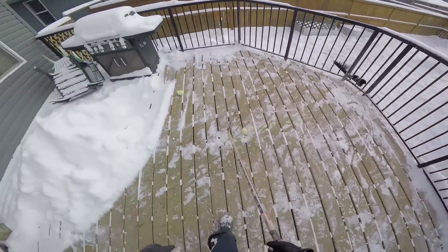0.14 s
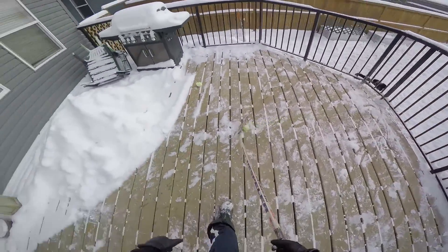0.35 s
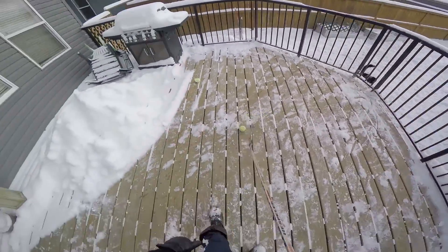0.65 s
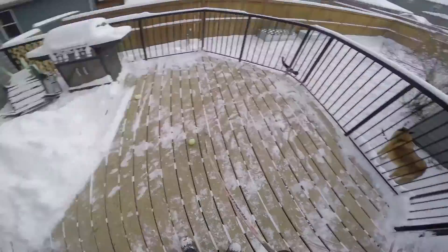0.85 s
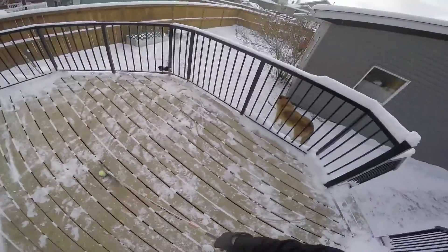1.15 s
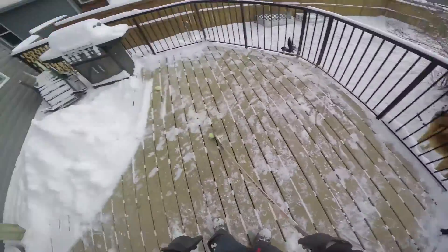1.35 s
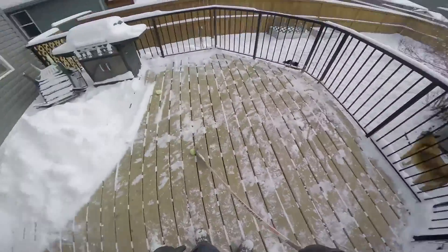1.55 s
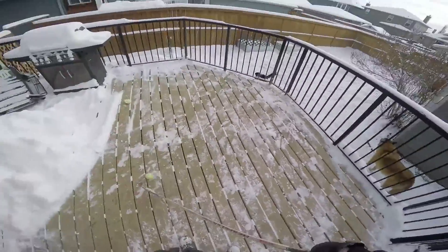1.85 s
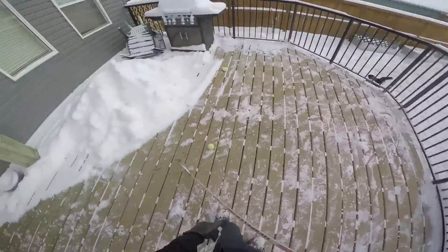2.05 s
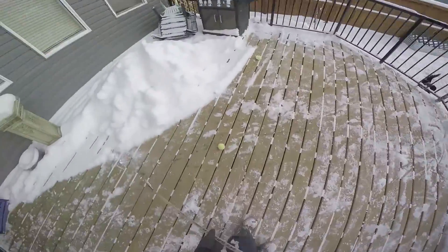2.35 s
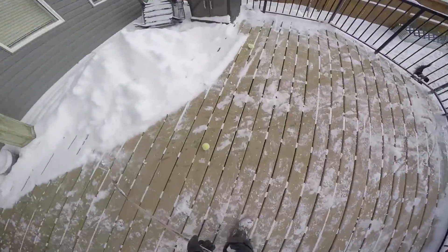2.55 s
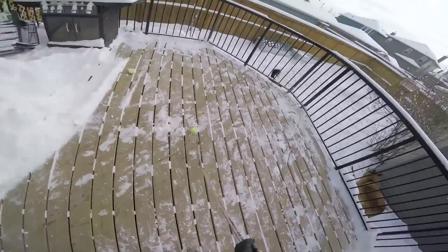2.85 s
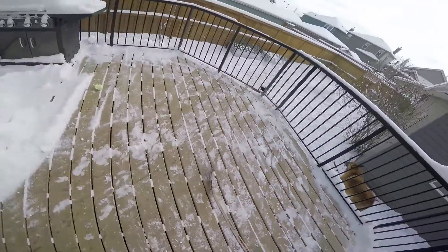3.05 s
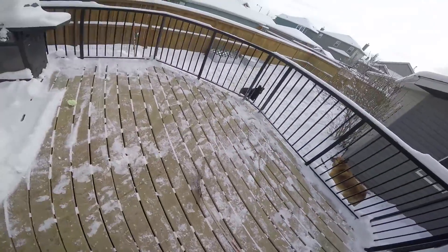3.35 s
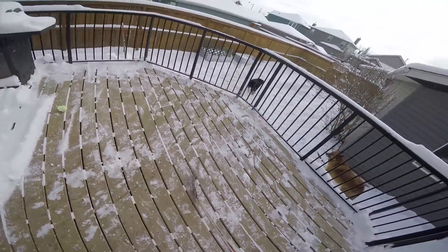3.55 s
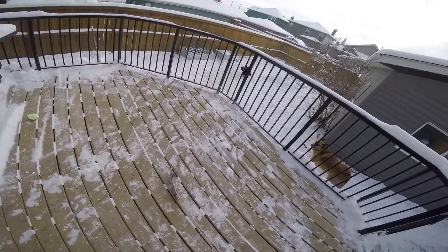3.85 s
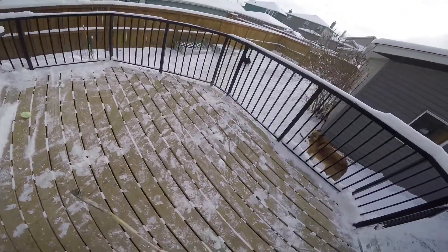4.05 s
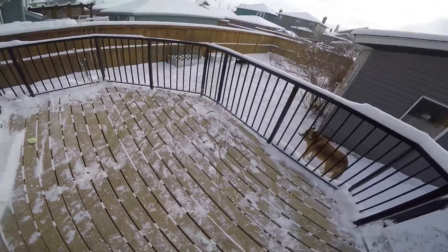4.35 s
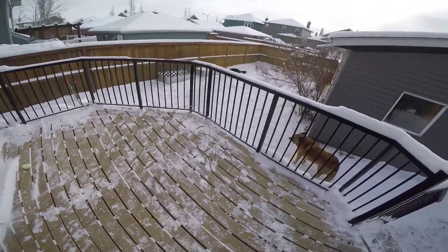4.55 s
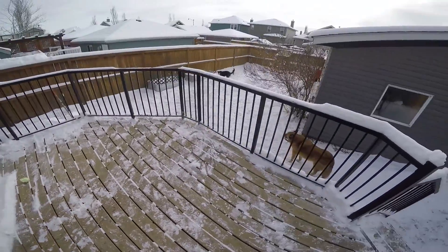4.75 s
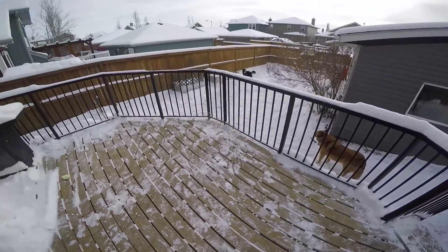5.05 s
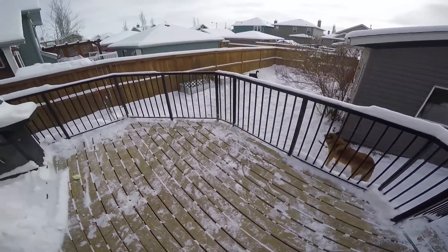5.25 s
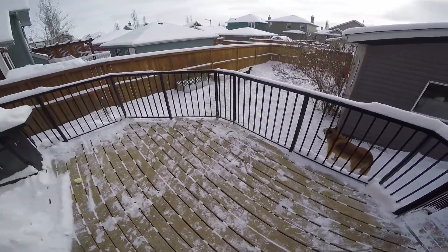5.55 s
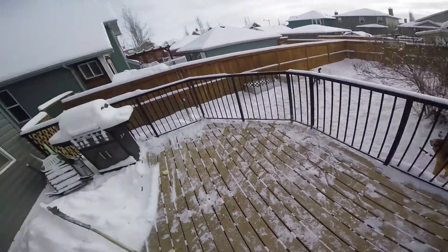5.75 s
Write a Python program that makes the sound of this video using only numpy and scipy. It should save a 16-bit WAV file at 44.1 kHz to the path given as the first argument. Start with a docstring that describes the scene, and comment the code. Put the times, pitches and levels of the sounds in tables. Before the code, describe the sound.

Hollow, short deck knocks and gritty snow scuffs come irregularly, sparser around two seconds. Then a stick swishes and hits the boards hard, by far the loudest moment, slightly overloaded. Afterwards come a dull thud, dragging soles, cloth swish and clustered light knocks. Very high, faint tag tinkles appear far off. Mono sound from a closed camera housing, muffled bass rumble, thin steady air noise.

```python
"""Knocks of boots and blows of a stick ring a snow-dusted wooden deck; snow crunches, cloth and soles swish.
A swung stick whoops once, something squeaks twice underfoot and collar tags tinkle far off.
Wind and handling rumble on a closed camera housing, and its electronics whine faintly over steady air noise.
Knocks, tags and dragged soles are sums of decaying modes; snow, cloth, wind and air are shaped noise."""
import sys
import numpy as np
from scipy import signal
from scipy.fft import rfft, irfft
from scipy.io import wavfile
from scipy.ndimage import uniform_filter1d

SR = 44100
rng = np.random.default_rng(int(sys.argv[2]) if len(sys.argv) > 2 else 0)


def transcribe(u):
    """Save the signal u as a 16-bit wav file named by the first command-line argument.

    u: samples, shape (n,) or (channels, n), limited to [-1, 1]; the rate is SR.
    q: integer samples, one column per channel.
    """
    v = np.clip(np.atleast_2d(u).T, -1, 1)
    q = np.round(v * 32767).astype(np.int16)
    wavfile.write(sys.argv[1], SR, q)


N = 260383  # length in samples


def undb(db):
    """Level to amplitude: 20 dB is a factor of ten."""
    return 10 ** (np.asarray(db) / 20)


def unit(x):
    """Normalization to an rms of 1."""
    return x / np.sqrt(np.mean(x ** 2))


def peak(x, db):
    """Normalization to a peak level in dB."""
    return x * undb(db) / np.abs(x).max()


def decay(t, t60):
    """Exponential decay: the level falls 60 dB in t60 seconds."""
    return np.exp(-np.log(1000) * t / t60)


def onset(t, rise_s):
    """Exponential build-up with time constant rise_s."""
    return 1 - np.exp(-t / rise_s)


def colour(x, spectrum):
    """Spectral shaping: weight x by (Hz, dB) points joined on a log frequency axis; rms 1."""
    hz, db = np.transpose(spectrum)
    f = np.maximum(np.arange(len(x) // 2 + 1) * SR / len(x), 1)
    gain = undb(np.interp(np.log(f), np.log(hz), db))
    return unit(irfft(rfft(x) * gain, len(x)))


def ring(modes, t, chance, detune, scatter_db):
    """Modal superposition: decaying sines, with levels and pitches varied by chance."""
    hz, db, t60 = np.transpose(modes)[:, :, None]
    level_chance = chance[:len(hz), None]
    pitch_chance = chance[-len(hz):, None]
    amplitude = undb(db + scatter_db * level_chance)
    tone = np.sin(2 * np.pi * hz * (1 + detune * pitch_chance) * t)
    return (amplitude * decay(t, t60) * tone).sum(0)


def grains(rate, spread_db):
    """Random impulse train: rate clicks a second on average, a few much bigger than the rest."""
    hits = rng.random(N) < rate / SR
    return hits * rng.standard_normal(N) * undb(spread_db * rng.exponential(size=N))


def walk(rate):
    """Slow random modulation: levels held 1 / rate seconds, then smoothed twice; rms 1."""
    k = int(SR / rate)
    held = np.repeat(rng.standard_normal(N // k + 1), k)
    return unit(uniform_filter1d(uniform_filter1d(held, k), k)[:N])


def add(out, x, s):
    """Superposition: add x into out from s seconds on."""
    i = int(s * SR)
    out[i:i + len(x)] += x[:len(out) - i]


# Spectrum of the air noise. Each row: frequency in Hz, relative density in dB.
AIR_SPECTRUM = [(88, -30), (150, -5.5), (410, 0.5), (640, -23), (4100, -23.5), (4790, -24), (10200, -30),
                (11900, -30.5), (12900, -26.5), (13600, -33), (15300, -29.5)]
AIR_RMS_DB = -59


def air():
    """Stationary noise: steady random pressure with a fixed spectrum."""
    return undb(AIR_RMS_DB) * colour(rng.standard_normal(N), AIR_SPECTRUM)


# Whine of the electronics. Each row: frequency in Hz, rms level in dB.
WHINE_TONES = [(12618, -75)]


def whine():
    """Pure tone: a constant sine, whose amplitude is root two times its rms."""
    t = np.arange(N) / SR
    return sum(np.sqrt(2) * undb(db) * np.sin(2 * np.pi * hz * t) for hz, db in WHINE_TONES)


# Spectrum of wind and handling on the housing. Each row: frequency in Hz, relative density in dB.
WIND_SPECTRUM = [(8.8, -59), (15, 5.5), (51, 2), (62, 2.5), (71, 0.5), (124, -15.5), (200, -15.5),
                 (260, -65), (440, -120)]


def rumble():
    """Low-frequency noise: random pushes on the housing, strongest in the bass."""
    return colour(rng.standard_normal(N), WIND_SPECTRUM)


# Spectrum of cloth and soles. Each row: frequency in Hz, relative density in dB.
SWISH_SPECTRUM = [(2120, -23), (3600, -7), (3890, -10), (4910, 0.5), (6050, -6.5), (7150, -17),
                  (7870, -14.5), (8870, -31), (11300, -22.5), (15000, -33)]


def swish():
    """Friction noise: rubbing cloth and soles give treble noise of fluctuating level."""
    return colour(rng.standard_normal(N), SWISH_SPECTRUM) * undb(1.1 * walk(41))


# Modes of the metal tags, two near 13 kHz, then the low and the high one.
# Each row: frequency in Hz, decay time T60 in seconds.
TAG_MODES = [(13330, .09), (13600, .12), (9458, .15), (15052, .1)]
# Touches of the tags. Each row: start in seconds, then nominal mode levels in dB,
# near 13 kHz, near 9 kHz, near 15 kHz.
TAG_TOUCHES = [(2.9514, -64, -55, -93), (3.034, -59, -51, -68), (3.0749, -58, -51, -75),
               (3.4705, -66, -88, -86), (3.5784, -82, -60.5, -99), (3.903, -49, -64, -62),
               (3.9394, -54, -63, -66), (4.1749, -57, -58, -72), (4.5545, -62, -77, -71),
               (4.5715, -67, -83, -66), (5.4171, -70, -89, -85), (5.4475, -70, -81, -86),
               (5.4869, -67, -68, -82), (5.6042, -67, -85, -74), (5.6454, -71, -66, -71),
               (5.6795, -66, -73, -74), (5.8017, -71, -84, -63), (5.8444, -71, -83, -66)]


def tags():
    """Modes of small stiff plates: thin tags touching on a collar ring only at very high pitches."""
    out, t = np.zeros(N), np.arange(SR // 4) / SR
    for s, top_db, low_db, high_db in TAG_TOUCHES:
        levels = (top_db, top_db, low_db, high_db)
        modes = [(hz, db, t60) for (hz, t60), db in zip(TAG_MODES, levels)]
        add(out, ring(modes, t, rng.standard_normal(8), 0.0064, 1.5) * onset(t, 0.008), s)
    return out * undb(3 * walk(100))  # jangling


# The whoop of the swung stick, then two squeaks underfoot. Each row: time of the maximum in seconds,
# pitch there in Hz, level in dB, half length in seconds, glide per second (half the relative pitch slope).
GLIDING_TONES = [ (2.696, 371, -25, .013, 2.5), (3.333, 4800, -58, .012, .4), (3.372, 1450, -48, .016, .3),
                 ]


def tones():
    """Frequency glide: a short swell of rising pitch with a faint overtone at four times its frequency."""
    out = np.zeros(N)
    for s, hz, db, half, glide in GLIDING_TONES:
        t = np.arange(N) / SR - s
        swell = np.exp(-(t / np.where(t < 0, half, 1.4 * half)) ** 2)  # fades more slowly than it grows
        phase = 2 * np.pi * hz * t * (1 + glide * np.clip(t, -half, half))
        out += undb(db) * swell * (np.sin(phase) + undb(-36) * np.sin(4 * phase))
    return out


# Shifts of weight and slides of a boot. Each row: start in seconds, length in seconds, then nominal levels
# in dB of the rumble, the drag on the boards, the snow crunch, the swish.
BOOT_SCUFFS = [(0.0, 0.15, -53, -47.5, -56.5, -75), (0.16, .08, -51, -66, -61, -65.5),
               (0.25, 0.16, -47.5, -56.5, -56, -61), (0.366, 0.081, -47, -48.5, -53.5, -60),
               (0.484, 0.044, -41, -54, -52.5, -80), (0.554, 0.12, -56, -71, -69, -60.5),
               (0.623, 0.12, -52, -56, -62, -61.5), (0.764, .13, -38, -47.5, -52.5, -65),
               (0.93, 0.097, -37.5, -51.5, -63, -88), (1.144, 0.023, -35.5, -52, -81, -69),
               (1.25, 0.23, -50.5, -63, -64, -64), (1.487, .22, -53, -72, -63, -63),
               (1.894, .07, -47, -66, -70, -91), (2.089, 0.015, -48, -41.5, -68, -78),
               (2.249, 0.098, -34, -44, -57, -80), (2.392, 0.056, -42, -46, -61, -68),
               (2.496, 0.093, -60, -52.5, -57.5, -66.5), (2.755, 0.089, -41.5, -40.5, -54, -62.5),
               (2.848, 0.14, -31.5, -42, -52.5, -56.5), (3.043, .11, -24.5, -30.5, -52.5, -59.5),
               (3.18, 0.12, -35.5, -58, -71, -82), (3.296, 0.053, -50, -49.5, -58, -65),
               (3.332, 0.095, -41, -47.5, -51, -76), (3.481, 0.12, -31, -46, -58.5, -84),
               (3.806, 0.099, -45, -58, -66.5, -60.5), (4.03, 0.054, -57, -81, -68, -63),
               (4.095, 0.041, -31.5, -57, -62, -57), (4.116, 0.33, -38.5, -42.5, -50, -48.5),
               (4.469, 0.11, -41.5, -42.5, -80, -67), (4.751, 0.039, -44, -41, -71, -85),
               (4.927, 0.13, -47, -66, -63.5, -84), (5.06, 0.15, -39, -38, -54.5, -68),
               (5.171, .12, -45, -49.5, -49, -69), (5.45, 0.064, -55, -49.5, -58.5, -64.5),
               (5.564, 0.13, -44, -52, -57.5, -65.5), (5.724, 0.11, -58, -48.5, -59.5, -67)]
# One value for each of those four layers: level between scuffs in dB, attack in seconds,
# share of a scuff's length spent on growing further, release T60 in seconds.
RESTING_DB = (-47.5, -106, -67, -80)
LAYER_ATTACK_S = (0.01, 0.032, 0.041, 0.013)
LAYER_SWELL_SHARE = (0.037, 0.068, .35, 0.48)
LAYER_RELEASE_T60_S = (0.48, .2, 0.25, 0.17)


def scuffing():
    """Addition of powers: in each layer's gain, scuffs swell, hold and die away over a resting level."""
    u, gains = np.arange(SR) / SR, []  # each scuff is followed for a second
    layers = zip(RESTING_DB, LAYER_ATTACK_S, LAYER_SWELL_SHARE, LAYER_RELEASE_T60_S)
    for k, (rest_db, attack, swell, t60) in enumerate(layers):
        power = np.full(N, undb(rest_db) ** 2)
        for s, length, *levels in BOOT_SCUFFS:
            rise = np.clip(u / (attack + swell * length), 0, 1)
            shape = rise * decay(np.maximum(u - attack / 2 - length, 0), t60)
            early = max(int((attack / 2 - s) * SR) + 1, 0)  # samples that would fall before time zero
            add(power, (undb(levels[k]) * shape[early:]) ** 2, max(s - attack / 2, 0))
        gains.append(np.sqrt(power))
    return gains


# Spectrum of crushed snow. Each row: frequency in Hz, relative density in dB.
CRUNCH_SPECTRUM = [(350, -8), (520, -2), (700, -8.5), (950, -6), (1250, -6), (1600, -7.5), (2300, -11),
                   (2900, -8.5), (3500, -15.5), (4900, -13), (6200, -26.5), (9000, -35), (15000, -67)]


def crunch():
    """Granular fracture: snow crystals break in dense small clicks over a hiss of finer ones."""
    breaking = unit(grains(2000, 2.3)) + 1.58 * rng.standard_normal(N)
    return colour(breaking, CRUNCH_SPECTRUM) * undb(1.5 * walk(40))


# Modes of the joists and of the deck boards, also rung by the knocks below.
# Each row: frequency in Hz, relative level in dB, decay time T60 in seconds.
JOIST_MODES = [(74.3, 7.5, 0.026), (129.4, 1, 0.15), (157.6, -6.5, 0.16), (211.6, -14, 0.32)]
BOARD_MODES = [(250, -11, 0.15), (313, -3.5, 0.085), (381, 5.5, 0.037), (428.3, -3, 0.06),
               (506.2, -6.5, 0.067), (577.2, -12, 0.069), (624.5, -17.5, 0.056), (763, -21.5, 0.097),
               (922, -15.5, 0.047), (1125, -8, 0.021), (1567, -26, 0.052)]


def drag():
    """Stick-slip excitation: the sole slips at random moments and each soft slip rings the boards."""
    t, still = np.arange(SR // 5) / SR, np.zeros(len(BOARD_MODES))
    joists = undb(-12) * ring(JOIST_MODES[1:], t, still, 0, 0)
    body = ring(BOARD_MODES, t, still, 0, 0) + joists
    return unit(signal.fftconvolve(grains(600, 2.08), body * onset(t, 0.0091))[:N])


# Spectra of the woody click and of the icy crack. Each row: frequency in Hz, relative density in dB.
WOODY_SPECTRUM = [(300, -25.5), (550, 2.5), (1100, 7), (2000, -8), (4000, -23.5), (15000, -69)]
ICY_SPECTRUM = [(900, -9), (2200, 3), (2900, 3), (3600, -1), (4900, 2), (6200, -8.5), (8000, -20.5),
                (15000, -33.5)]
# Steps and blows. Each row: start in seconds, note of the struck board in Hz, board ring peak in dB,
# joist thud peak in dB, woody click and icy crack peaks in dB before the gain and grit they share,
# scatter in dB relative to their first burst, factor on the T60 of the boards and of the note.
DECK_KNOCKS = [(0.038, 400, -39, -38.5, -37, -72, -16, 2.6), (0.115, 418, -35.5, -65, -48, -56, -1, 2.3),
               (0.226, 273, -37.5, -45, -65, -53, -2, 0.51),
               (0.384, 372, -33.5, -42.5, -42, -44.5, -17, 0.88),
               (0.654, 342, -42, -59, -72, -44.5, -3, 1.6), (0.78, 416, -32.5, -28.5, -49, -41, 6, 1.7),
               (1.135, 373.6, -30, -27.5, -45.5, -37.5, -7, 1.9),
               (1.149, 318, -28.5, -41, -58, -45.5, 5, .74), (1.185, 318, -36.5, -49, -73, -70, -14, 2.7),
               (1.298, 322, -37, -57, -64, -40.5, -5, 3.3), (1.346, 339, -27, -42, -43, -36.5, -13, 1.8),
               (1.417, 340, -38.5, -43, -75, -50, 0, 2), (2.089, 315, -37, -53, -48.5, -44.5, -13, 2.3),
               (2.249, 244, -34.5, -34, -59, -49, -3, 2), (2.415, 529, -31, -35, -51, -36.5, -16, 1),
               (2.463, 361, -52, -50, -55, -50, -17, 0.66), (2.776, 445, -38, -51, -45, -64, -9, 1.5),
               (2.83, 350, -10.5, -23.5, -30.5, -13.5, -45, 0.44), (2.84, 282, -38, -29, -51, -22, 14, 1.1),
               (2.953, 387, -32, -25.5, -39, -41, -9, 3.4), (2.982, 385, -29, -47, -66, -43, -3, 0.74),
               (3.034, 387.7, 0, -8, -6.5, -23.5, -14.5, 1.02), (3.049, 328, -11, -38, -17, -42, 0, 2.4),
               (3.17, 308, -26.5, -42, -52, -62, -9, 1.8), (3.236, 304, -50, -47, -45.5, -52, -15, 0.96),
               (3.307, 344.5, -34.5, -28.5, -52, -58, -8, 3.5), (3.499, 244, -46, -6.5, -46, -50.5, 9, .85),
               (3.779, 379, -37, -32.5, -75, -71, -19, 2.4), (4.098, 291, -26, -26, -47, -52, -7, 2.2),
               (4.239, 348, -24.5, -46, -40.5, -37.5, -15, 0.93), (4.442, 357, -25.5, -47, -50, -55, -9, 1),
               (4.475, 348, -27, -30, -43, -55, 2, 1.7), (4.543, 359, -26, -47, -42.5, -63, -6, 1.07),
               (4.719, 363, -30.5, -42, -42.5, -82, -5, 1.05),
               (4.762, 363, -23.5, -41, -43, -58, -14, 0.53), (5.039, 435, -28.5, -35, -41, -55.5, 2, 0.73),
               (5.079, 412, -26.5, -45, -42, -51, -15, 3.7), (5.106, 429, -30.5, -43, -50, -62, -9, 1.6),
               (5.137, 466, -22, -54, -42, -66, -2, 1), (5.159, 385, -26, -33, -45, -47.5, 0, 1.4),
               (5.218, 472, -23, -46, -39, -52, -6, .7), (5.447, 503, -38, -48, -53, -65, -11, 0.61),
               (5.554, 344, -45, -35.5, -52, -53.5, -4, 1.8)]
CONTACT_MS, HARD_CONTACT_MS, HARD_ABOVE_DB = 1.71, 0.39, -5  # the hardest blow touches for a shorter time
NOTE_DB, NOTE_T60_S = 7, 0.068  # the struck board's own note, before the T60 factor of the knock
SNAP_RISE_S, SNAP_DECAY_S, SCATTER_T60_S = 0.00055, 0.0019, 0.16  # rise and decay are time constants
SNAP_GAIN_DB, BOARD_LAG_S = 1.5, 0.001584


def knocks():
    """Impact excitation: a contact snaps, rings joists, deck and struck board, and leaves a gritty scatter."""
    out, t = np.zeros(N), np.arange(SR // 2) / SR
    lead = 128  # samples of room for what the shaping spreads ahead of the contact
    grit = undb(0.84 * walk(300))
    for s, note_hz, board_db, thud_db, click_db, crack_db, scatter_db, t60_factor in DECK_KNOCKS:
        chance = rng.standard_normal(2 * len(BOARD_MODES) + 2)
        noise = rng.standard_normal(len(t))

        contact_ms = HARD_CONTACT_MS if board_db > HARD_ABOVE_DB else CONTACT_MS
        push = np.hanning(int(contact_ms * SR / 1000) + 3)  # a longer push weakens the high modes
        modes = np.array(BOARD_MODES + [(note_hz, NOTE_DB, NOTE_T60_S)])
        struck = modes * [1, 1, t60_factor]  # each knock rings for its own length
        boards = signal.fftconvolve(ring(struck, t, chance, 0.018, 1.8), push)[:len(t)]
        boards = boards * onset(t, 0.002)  # the wave needs a moment to spread along the board
        thud = ring(JOIST_MODES, t, chance, 0.01, 1.5) * onset(t, 0.003)

        fade = np.exp(-t / SNAP_DECAY_S) + undb(scatter_db) * decay(t, SCATTER_T60_S)
        burst = np.roll(noise * fade * onset(t, SNAP_RISE_S), lead)
        click = peak(colour(burst, WOODY_SPECTRUM), click_db)
        crack = peak(colour(burst, ICY_SPECTRUM), crack_db)
        rough = grit[int(s * SR / 2):][:len(t)]  # another stretch of grit for each knock

        add(out, peak(boards, board_db) + peak(thud, thud_db), s + BOARD_LAG_S)
        add(out, undb(SNAP_GAIN_DB) * (click + crack) * rough, s - lead / SR)
    return out


def scene():
    """Linear superposition: the scuffing layers under their gains, plus all other sources, in one channel."""
    rumble_gain, drag_gain, crunch_gain, swish_gain = scuffing()
    background = air() + whine() + rumble_gain * rumble()
    moving = swish_gain * swish() + crunch_gain * crunch() + drag_gain * drag()
    return (background + moving + tags() + tones() + knocks())[None]


def record(dry):
    """Saturation and band limiting: the camera rounds the loudest peaks and cuts the top above 15.4 kHz."""
    rounded = np.tanh(dry)
    low_pass = signal.ellip(10, 0.2, 60, 15400, fs=SR, output="sos")
    return signal.sosfilt(low_pass, rounded)


dry = scene()
out = record(dry)
transcribe(out)
```